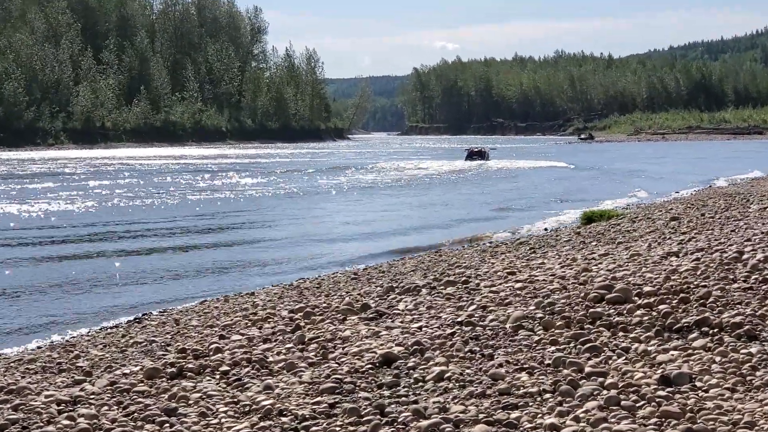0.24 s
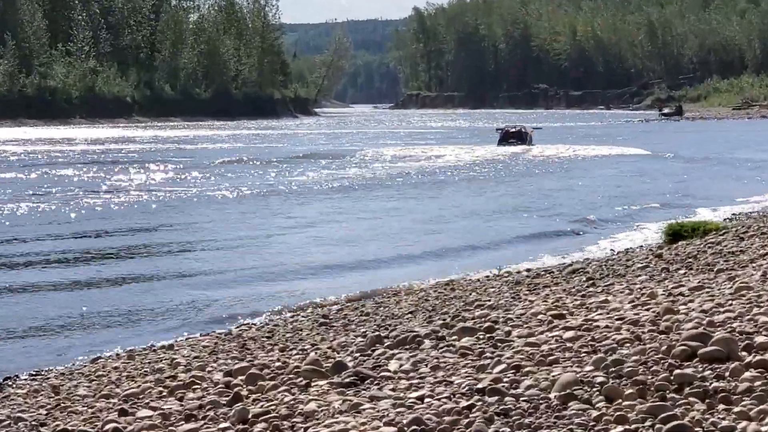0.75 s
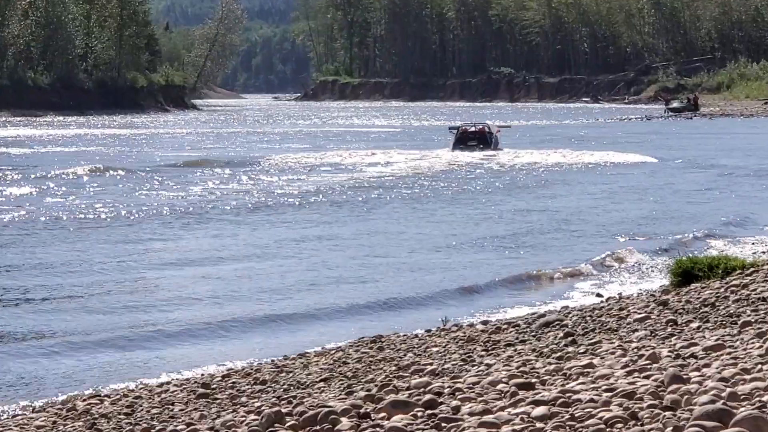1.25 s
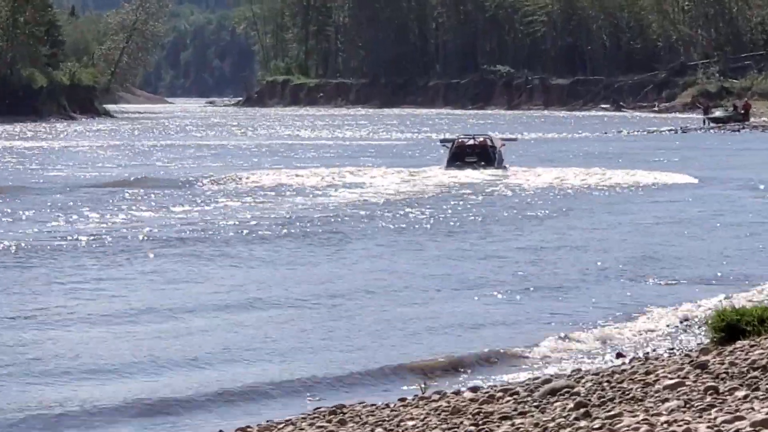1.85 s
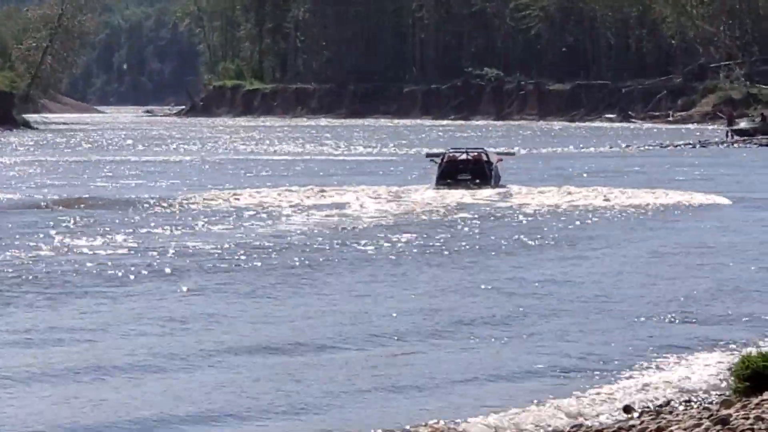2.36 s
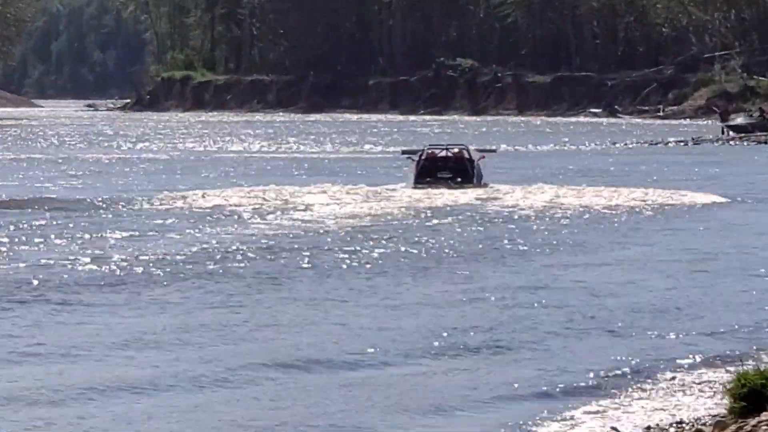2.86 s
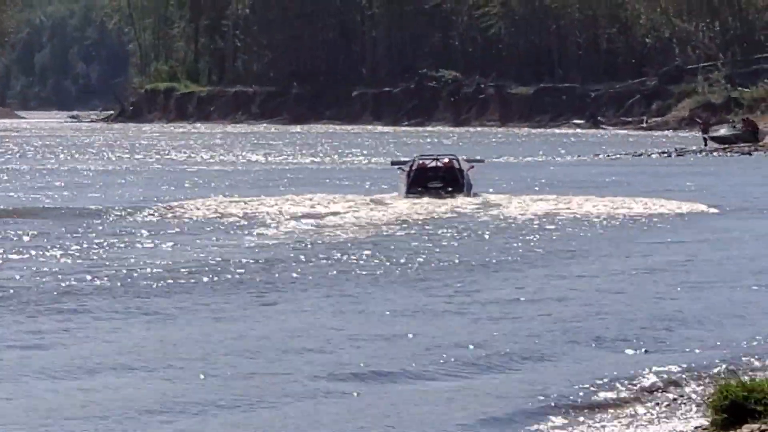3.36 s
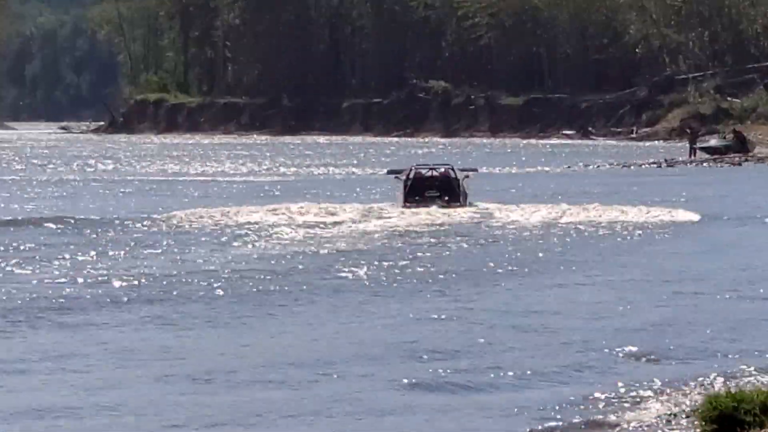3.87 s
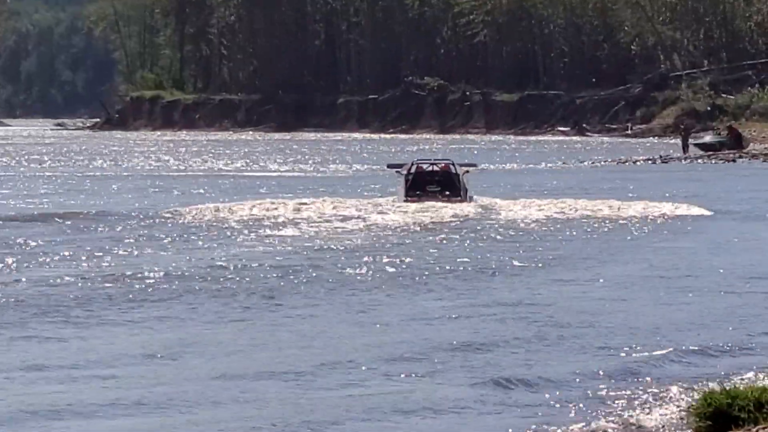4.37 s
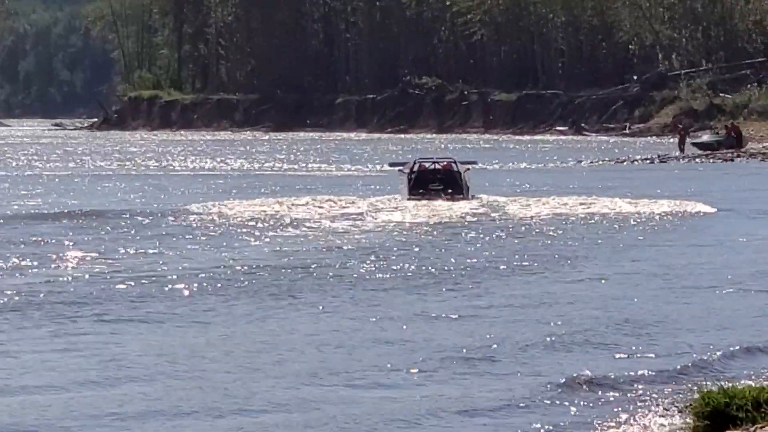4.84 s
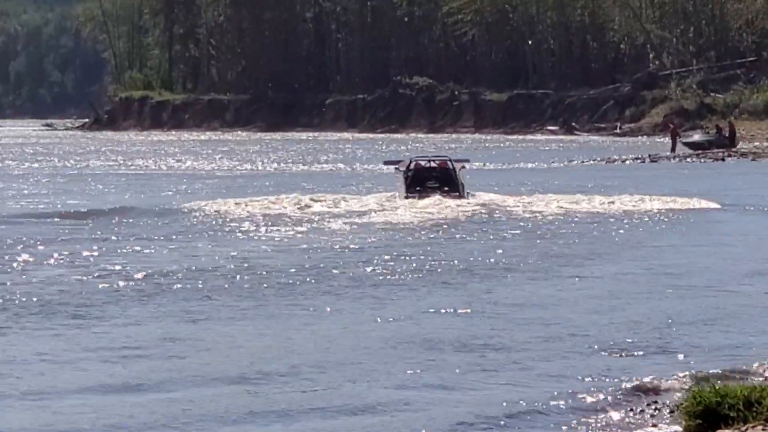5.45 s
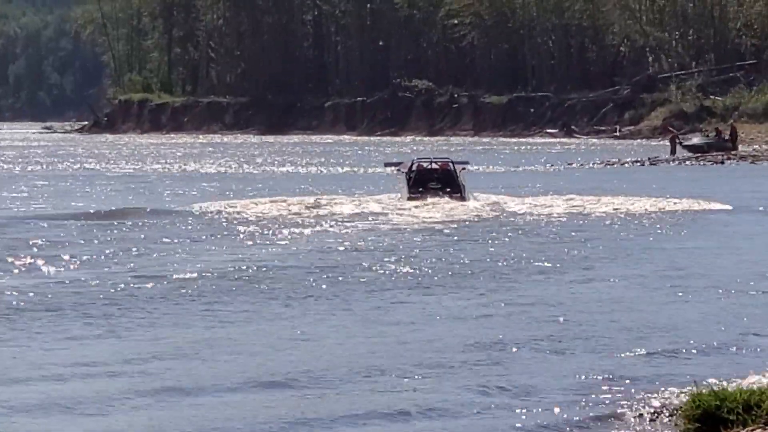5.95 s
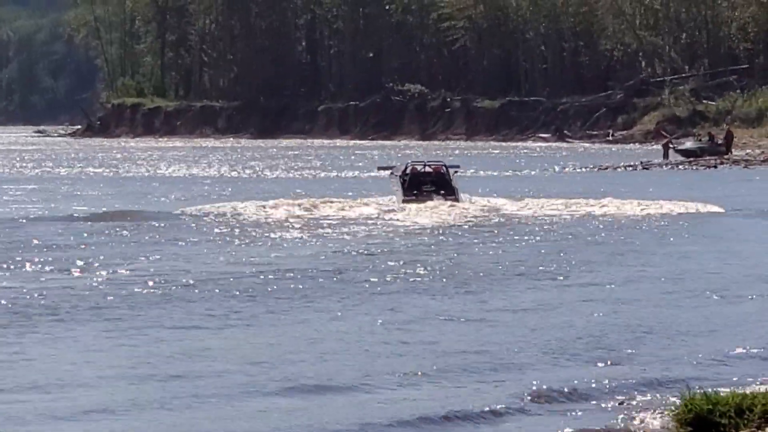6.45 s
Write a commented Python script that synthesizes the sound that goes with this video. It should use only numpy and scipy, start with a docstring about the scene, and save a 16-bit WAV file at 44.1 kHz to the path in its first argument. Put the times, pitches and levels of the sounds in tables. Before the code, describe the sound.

Heard from a river shore, a jet boat revs up and eases off three times, with a deep engine throb and wake wash.

```python
"""A V8 jet boat works up a river, heard from a gravel shore. From the start its exhaust tones echo
off the far bank, a slower engine booms close by, and exhaust roar and wake wash fill the gaps.
Two small ticks sound near the microphone; the V8's revs climb and drop back at 1.8 s.
Faint rustles come from 2.5 s, a far boat drones from 2.6 to 5.2 s, the V8 drops again at 3.5 s.
Another engine revs up from 4.2 s; the V8 drops a third time at 5 s and climbs to the end."""
import sys
import numpy as np
from scipy import signal
from scipy.io import wavfile
from scipy.ndimage import uniform_filter1d

SR = 44100
rng = np.random.default_rng(int(sys.argv[2]) if len(sys.argv) > 2 else 0)


def transcribe(signal):
    """Save signal, clipped to [-1, 1], as a 16-bit WAV file at the path in sys.argv[1]."""
    frames = np.atleast_2d(signal).T
    limited = np.clip(frames, -1, 1)
    pcm = np.round(limited * 32767).astype(np.int16)
    wavfile.write(sys.argv[1], SR, pcm)


N = 295911
TIME_S = np.arange(N) / SR


def from_db(db):
    """Decibels to gain."""
    return 10 ** (np.asarray(db) / 20)


def unit_rms(x):
    """Scale to rms 1."""
    return x / np.sqrt(np.mean(x ** 2) + 1e-20)


def in_time(rows, delay_s=0):
    """Columns of a time table, interpolated per sample."""
    time_s, *columns = np.transpose(rows)
    return [np.interp(TIME_S - delay_s, time_s, column) for column in columns]


def at_hz(rows, hz):
    """Spectrum table, interpolated over log frequency."""
    freq_hz, values = np.transpose(rows)
    return np.interp(np.log(hz), np.log(freq_hz), values)


def butterworth(x, order, edge_hz, kind):
    """Causal Butterworth filter."""
    return signal.sosfilt(signal.butter(order, edge_hz, kind, fs=SR, output="sos"), x)


def drift(rate_hz):
    """Slow random wander, rms 1: noise through two one-pole low-passes."""
    hop = 40
    pole = np.exp(-2 * np.pi * hop * rate_hz / SR)
    slow = signal.lfilter([1], [1, -2 * pole, pole * pole], rng.standard_normal(N // hop + 2002))[2000:]
    return np.interp(np.arange(N) / hop, np.arange(len(slow)), unit_rms(slow))


def to_ports(mid, hz, side):
    """Mid and side to the two microphone ports, with their level balance at hz."""
    # port balance: freq_hz, left_minus_right_db
    balance = [(60, 1), (150, 2), (300, -0.1), (600, 0.3), (1460, 1.5), (2500, -2.5), (4200, -1),
               (7200, -2), (10000, 1.5), (14000, 1)]
    lead = from_db(at_hz(balance, hz) / 2)
    return np.array([lead * (mid + side), (mid - side) / lead])


def orders(base_hz, table, waver_hz, jitter_rad, side_db, colour=None):
    """Sines on multiples of an engine rate; air over the water wavers their level and phase."""
    base_rad, out = 2 * np.pi * np.cumsum(base_hz) / SR, 0
    for multiple, level_db, waver_db in table:
        phase = multiple * base_rad + 2 * np.pi * rng.random() + jitter_rad * drift(waver_hz)
        colour_db = 0 if colour is None else at_hz(colour, multiple * base_hz)
        gain = np.sqrt(2) * from_db(level_db + colour_db + waver_db * drift(waver_hz))
        side = from_db(side_db + 3 * drift(2.5)) * np.cos(phase)   # off centre: one port leads
        out = out + gain * to_ports(np.sin(phase), multiple * np.mean(base_hz), side)
    return out


def banded_noise(spectrum, flicker_db, flicker_hz):
    """Stereo noise in flickering third-octave bands, rms 1."""
    # left-right likeness: freq_hz, correlation
    likeness = [(40, 1), (110, 1), (170, 0.57), (260, 0.85), (360, 0.67), (520, 0.94), (700, 0.2),
                (930, 0.21), (1400, -0.5), (1800, 0.1), (2300, 0.2), (3600, 0.2), (7200, -0.11)]
    out, common = 0, drift(1.6)
    octaves = np.log2(spectrum[-1][0] / spectrum[0][0])
    edges_hz = spectrum[0][0] * 2 ** np.arange(0, octaves + .2, 1 / 3)
    white = rng.standard_normal((2, 2, N))
    for k, (low_hz, high_hz) in enumerate(zip(edges_hz, edges_hz[1:])):
        mid, side = butterworth(white[k % 2], 2, [low_hz, high_hz], "band")
        hz = np.sqrt(low_hz * high_hz)
        alike = np.clip(at_hz(likeness, hz), -1, 1)
        gain = from_db(at_hz(spectrum, hz) + flicker_db * (0.23 * common + drift(flicker_hz)))
        out = out + gain * to_ports(np.sqrt(1 + alike) * mid, hz, np.sqrt(1 - alike) * side)
    return unit_rms(out)


def engine(curve, table, jitter_rad, side_db):
    """Engine orders on a pitch and level curve, silent beyond a 51 ms fade at each end."""
    base_hz, level_db = in_time(curve)
    inside_s = np.minimum(TIME_S - curve[0][0], curve[-1][0] - TIME_S)
    running = np.clip(inside_s / 0.051 + 1, 0, 1)
    return running * from_db(level_db) * orders(base_hz, table, 11, jitter_rad, side_db)


def racing_v8(delay_s=0, firing_db=0, others_db=0, blur=1):
    """V8 exhaust: eight firings a cycle, three firm upper orders, weak ones from uneven cylinders."""
    # revs under throttle: time_s, cycle_hz
    revs = [(0, 34.2), (.15, 34.2), (.58, 35.8), (1.25, 37.5), (1.58, 38.9), (1.81, 41.2), (1.96, 38.3),
            (2.07, 36.5), (2.17, 35.3), (2.28, 35.3), (2.71, 37.2), (2.97, 39.1), (3.46, 41.8),
            (3.57, 41.1), (3.77, 38.0), (3.92, 36.7), (4.09, 36.5), (4.43, 38.2), (4.8, 39.4), (4.93, 39.9),
            (5.03, 38.2), (5.19, 34.3), (5.25, 34.1), (5.66, 35.8), (6.02, 37.0), (6.35, 37.5), (6.5, 38.1),
            (6.71, 39.3)]
    # pipe response at orders 8 (firing), 14, 16 and 24: pitch_hz, level_db
    pipe_8 = [(270, -24), (290, -24.5), (305, -21.5), (320, -16.5), (335, -11)]
    pipe_14 = [(470, -39), (515, -29.5), (545, -35), (580, -43)]
    pipe_16 = [(540, -42.5), (580, -36), (620, -38), (670, -41)]
    pipe_24 = [(810, -63), (870, -49.5), (930, -60.5), (1000, -63)]
    # uneven orders: multiple (rounded below), level_db, waver_db
    uneven_orders = [(3, 2, 1), (4, 2.5, 2), (5, 0.5, 2.5), (6, 5, 0.5), (7, -10, 5), (8.965, -5.5, -1.5),
                     (10, -3, 3), (11, -0.5, 3), (12, -1, 1), (13, -3.5, 2), (15, -16, 2), (23, -26, 2),
                     (26, -30.5, 2.5), (27, -22, 4.5), (28, -26.5, 4.5)]
    # their envelope: time_s, level_db
    uneven_level = [(0, -34.5), (.8, -35), (1.3, -33), (1.75, -34), (2.3, -36), (3.4, -33.5), (3.7, -43),
                    (4.0, -38.5), (4.8, -37), (5.8, -42), (6.71, -38)]
    # their pipe response: pitch_hz, gain_db
    pipe_uneven = [(100, -1.4), (250, -2.5), (330, 5), (400, -1), (460, 0), (520, -2.4), (580, -0.6),
                   (650, 10.5), (900, -0.6)]
    cycle_hz, = in_time(revs, delay_s)
    # overrun: orders lose level while the revs fall
    fall_hz_per_s = uniform_filter1d(np.maximum(-np.gradient(cycle_hz) * SR, 0), size=4000)
    firing_db_per_s, order_14_db_per_s = .6, .98   # fade as the boat draws away

    firing = orders(8 * cycle_hz, [(1, 0, .9)], 8, .08 * blur, side_db=-15, colour=pipe_8)
    firing *= from_db(firing_db - .06 * fall_hz_per_s - firing_db_per_s * TIME_S)
    fringe = orders(8 * cycle_hz, [(1, firing_db - 35.5, 3)], waver_hz=9, jitter_rad=2.5, side_db=-12)
    upper = orders(14 * cycle_hz, [(1, 0, 1.3)], 7, .12 * blur, side_db=-20, colour=pipe_14)
    upper *= from_db(-order_14_db_per_s * TIME_S)
    upper += orders(16 * cycle_hz, [(1, 0, 1.8)], 7, .12 * blur, side_db=-20, colour=pipe_16)
    upper += orders(24 * cycle_hz, [(1, 0, 2.5)], 4, .15 * blur, side_db=-10, colour=pipe_24)
    upper *= from_db(-.12 * fall_hz_per_s)
    whole = [(round(multiple), level_db, waver_db) for multiple, level_db, waver_db in uneven_orders]
    uneven = orders(cycle_hz, whole, 4, .28 * blur, side_db=-17.5, colour=pipe_uneven)
    uneven *= from_db(in_time(uneven_level, delay_s)[0] - .1 * fall_hz_per_s)
    return firing + fringe + from_db(others_db) * (upper + uneven)


def bank_echoes():
    """Late V8 copies, one from each side, blurred by trees; long waves reach both ports alike."""
    # far-bank reflections: delay_s, firing_db, others_db, left_share (-1..1)
    reflections = [(.42, -23, -12.5, .8), (.25, -19, -14.5, -.7)]
    out = 0
    for delay_s, firing_db, others_db, left_share in reflections:
        echo = racing_v8(delay_s, firing_db, others_db, blur=6.6).mean(axis=0)
        side = left_share * butterworth(echo, 2, 380, "high")
        out = out + np.array([echo + side, echo - side])
    return out


def booming_engine():
    """Slow engine nearby, hunting around its speed. The boom dips briefly;
    near 5 s it beats against the revving engine crossing its pitch."""
    # firing tone: time_s, pitch_hz, level_db
    curve = [(0, 84.1, -13.5), (.19, 80.8, -19), (.33, 77.7, -21), (.56, 75.76, -19), (.76, 79.4, -17),
             (.92, 81.56, -14.5), (1.4, 79.4, -14.5), (1.8, 76.16, -16.5), (2.05, 75.8, -14.5),
             (2.3, 77.7, -16), (2.5, 79.64, -14), (2.73, 81.2, -16), (3.1, 79.3, -17), (3.55, 82.1, -13),
             (3.9, 78.7, -16.5), (4.1, 77.65, -15.5), (4.48, 81.8, -18), (4.86, 78.33, -13.5),
             (4.94, 78.65, -20), (5.03, 80.2, -9.5), (5.12, 79.25, -11), (5.19, 78.8, -14),
             (5.28, 79.5, -14), (5.44, 81.7, -14.5), (5.68, 82.5, -12), (5.86, 82, -15.5),
             (6.1, 78.3, -14.5), (6.3, 78, -12.5), (6.71, 75.26, -14.5)]
    # engine orders: multiple, level_db, waver_db
    partials = [(0.501, -35.5, 0), (.67, -28.5, 3), (1, 0.5, 1.53), (1.332, -18, 2), (1.998, -24.5, 6)]
    # troughs in the boom (the two near 5.1 s stand for the beating): centre_s, depth_db, length_s
    troughs = [(.24, 6, 0.04), (0.725, 8.5, 0.049), (1.642, 7, 0.026), (1.941, 11.5, 0.032),
               (2.184, 5, 0.11), (2.306, 10.5, 0.043), (3.057, 5, 0.053), (5.073, 18, 0.036),
               (5.144, 7, 0.023), (5.424, 5.5, 0.067), (5.585, 6, .03), (6.04, 2.5, .04),
               (6.186, 5.5, 0.089), (6.48, 7, 0.034)]
    loss_db = sum(depth_db * np.exp(-(2 * (TIME_S - centre_s) / length_s) ** 2)
                  for centre_s, depth_db, length_s in troughs)
    return from_db(-loss_db) * engine(curve, partials, jitter_rad=0.068, side_db=-19.5)


def exhaust_roar():
    """Turbulent exhaust noise of all the boats."""
    # noise shape: freq_hz, density_db
    spectrum = [(20, -31.5), (30, -28), (48, -14), (62, -15.5), (82, -1.5), (105, -3.5), (138, -14.5),
                (200, -17.5), (290, -18), (400, -17.5), (550, -19.5), (680, -23.5), (850, -22.5),
                (1100, -35), (1500, -49.5)]
    # envelope: time_s, level_db, low_extra_db
    envelope = [(0, -29, -1), (.55, -32.5, -1), (.95, -27.5, 2.5), (1.7, -27, -1.5), (2.8, -27, -1),
                (3.6, -27.5, -3.5), (4.6, -28.5, -10.5), (5.2, -28, 1), (6.3, -28.5, -0.5),
                (6.71, -27.5, -12)]
    level_db, low_extra_db = in_time(envelope)
    noise = banded_noise(spectrum, flicker_db=1.07, flicker_hz=9.5)
    low = butterworth(noise, 2, 260, "low")
    high = -butterworth(noise, 2, 260, "high")   # inverted: no notch at the crossover
    return from_db(level_db) * (from_db(low_extra_db) * low + high)


def wake_wash():
    """Broken water far off; the upper band swells on its own, the air takes the very top."""
    # noise shape: freq_hz, density_db
    spectrum = [(530, -31.5), (900, -7.5), (1360, -6), (1890, -6), (2710, -12), (3390, -11.5), (4560, -24),
                (6240, -26.5), (7670, -65), (9970, -65.5), (16900, -120)]
    # envelope: time_s, level_db, upper_extra_db
    envelope = [(0.03, -42.5, -1), (0.05, -44, -0.5), (0.64, -43.5, -0.7), (0.94, -40.5, 0.4),
                (1.4, -42, 3), (1.46, -41.5, 0.5), (1.73, -40, 3.5), (1.79, -41.5, 0.9),
                (3.03, -41.5, -0.2), (3.33, -40, 1.5), (3.77, -43.5, 0.6), (5.42, -42.5, 0.2),
                (5.49, -41.5, -1), (6.68, -40.5, 0.4)]
    level_db, upper_extra_db = in_time(envelope)
    water = banded_noise(spectrum, flicker_db=0.63, flicker_hz=12)
    water = signal.sosfilt(signal.cheby2(6, 30, 7900, fs=SR, output="sos"), water)
    upper = butterworth(water, 1, [2800, 4300], "band")
    return from_db(level_db) * (water + (from_db(upper_extra_db) - 1) * upper)


def ticks():
    """Small clicks near the microphone, ringing briefly in high modes."""
    # impulses: start_s, level_db
    hits = [(0.7173, -42.5), (1.3146, -52.5)]
    # resonances: pitch_hz, gain_db, t60_s
    modes = [(6200, 3, 0.0065), (5300, -6, .008), (8800, -32, .006), (13500, -9.5, .004)]
    clicks, out = np.full(N, 1e-18), 0
    for start_s, level_db in hits:
        clicks[round(start_s * SR)] = from_db(level_db)
    for pitch_hz, gain_db, t60_s in modes:
        radius, step_rad = from_db(-60 / (t60_s * SR)), 2 * np.pi * pitch_hz / SR
        feedback = [1, -2 * radius * np.cos(step_rad), radius * radius]
        out = out + signal.lfilter([0, from_db(gain_db) * np.sin(step_rad)], feedback, clicks)
    return out


def rustles():
    """Faint swells of rough noise near the microphone: body below 8 kHz, top above."""
    # swells: centre_s, length_s, body_db, top_db
    swells = [(2.539, 0.028, -75, -70), (3.15, .12, -64, -72), (3.23, .03, -59, -66),
              (3.962, .02, -73.5, -77), (4.115, 0.14, -61.5, -67), (5.378, 0.058, -73, -76),
              (5.51, 0.053, -66, -68), (6.321, .11, -57, -70.5)]
    body, top = 0, 0
    for centre_s, length_s, body_db, top_db in swells:
        swell = np.exp(-(2 * (TIME_S - centre_s) / length_s) ** 2)
        body += from_db(body_db) * swell
        top += from_db(top_db) * swell
    body_noise = banded_noise([(5000, 3.5), (6500, -0.5), (7500, -6)], flicker_db=2.5, flicker_hz=30)
    top_noise = banded_noise([(8000, 0), (12000, -2), (17000, 1.5)], flicker_db=0.5, flicker_hz=30)
    return body * body_noise + top * top_noise


def far_boat():
    """Distant engine: one slowly rising tone."""
    # drone: time_s, base_hz, level_db
    curve = [(2.6, 243.8, -48), (2.9, 249, -36), (3.2, 254.4, -32.5), (3.6, 264.8, -42), (4.1, 269.8, -36),
             (4.6, 274.5, -33.5), (5.0, 274.8, -29), (5.2, 276.4, -48.5)]
    return engine(curve, [(0.99, 0.002, 0.88)], jitter_rad=0.057, side_db=-14.5)


def revving_engine():
    """Engine speeding up: a rising firing tone among closely spaced orders."""
    # firing tone: time_s, pitch_hz, level_db
    curve = [(4.2, 51.85, -42), (4.6, 58.25, -36), (4.8, 67.98, -40), (5.02, 82.15, -20), (5.19, 99.7, -34),
             (5.31, 110.1, -31), (5.57, 119.4, -30), (5.9, 125.8, -33), (6.12, 129, -33),
             (6.33, 134.5, -29.5), (6.71, 138.4, -31.5)]
    # engine orders: multiple, level_db, waver_db
    partials = [(.875, -8.5, 3), (1, 4.5, 0), (1.126, -11, 4), (1.25, -14, 4.5), (1.376, -4, 3),
                (1.5, -10.5, 4), (1.625, -9, 3.5), (1.75, -10.5, 6.5), (2, -4, 5.5)]
    return engine(curve, partials, jitter_rad=.3, side_db=-18.5)


def scene():
    """Boats, bank, water and small sounds close by."""
    boats = racing_v8() + bank_echoes() + booming_engine() + revving_engine() + far_boat()
    return boats + exhaust_roar() + wake_wash() + rustles() + ticks()


def record(dry):
    """Microphone: rounded peaks, hiss, 10 ms fade-in, steep top cut."""
    # self-noise shape: freq_hz, density_db
    spectrum = [(5500, 6), (7800, 1.5), (9000, -3), (11500, -2.5), (13000, 1), (15500, -6.5), (20000, 0)]
    hiss_db, cutoff_hz = -69, 15700
    hiss = from_db(hiss_db) * banded_noise(spectrum, flicker_db=.5, flicker_hz=4)
    rounded = 1.3 * np.tanh(dry / 1.3)
    fade = np.minimum(TIME_S / .01, 1)
    top_cut = signal.ellip(12, .3, 70, cutoff_hz, fs=SR, output="sos")
    return signal.sosfilt(top_cut, fade * (rounded + hiss))


dry = scene()
out = record(dry)
transcribe(out)
```